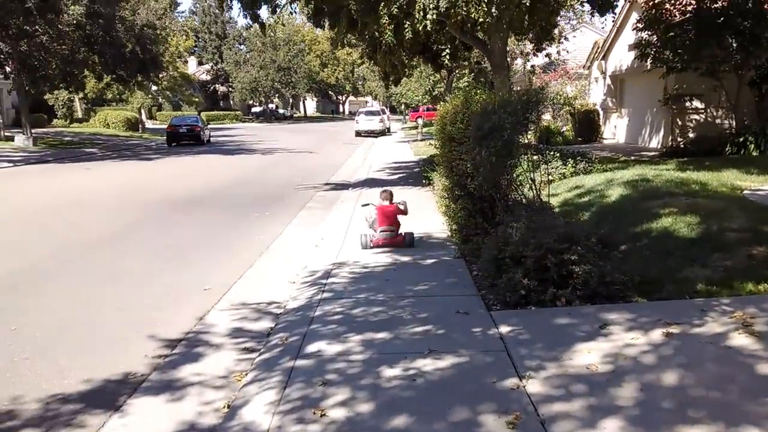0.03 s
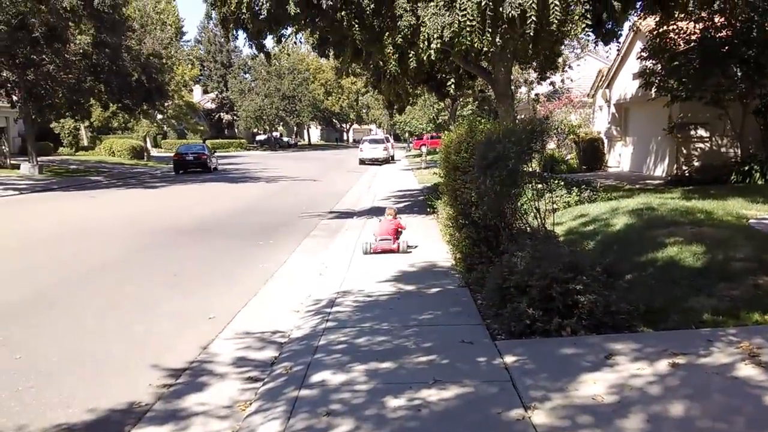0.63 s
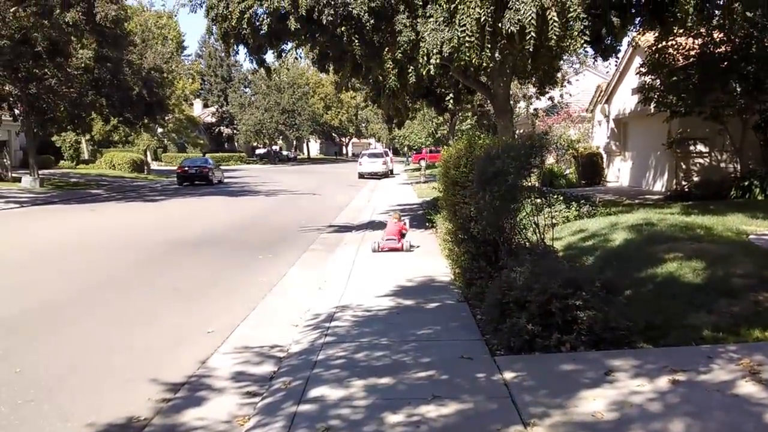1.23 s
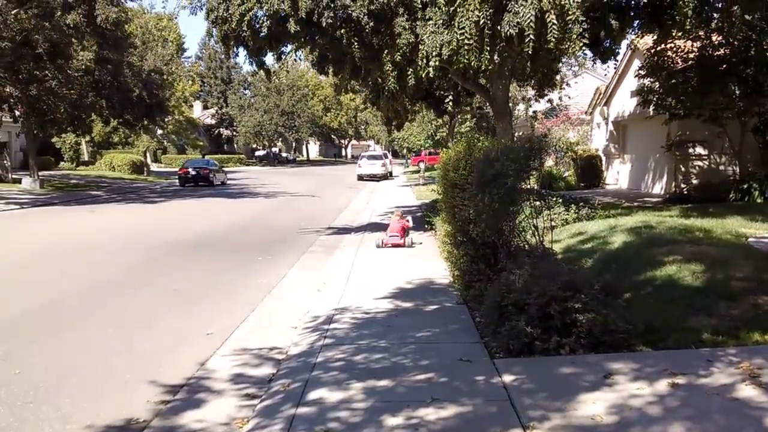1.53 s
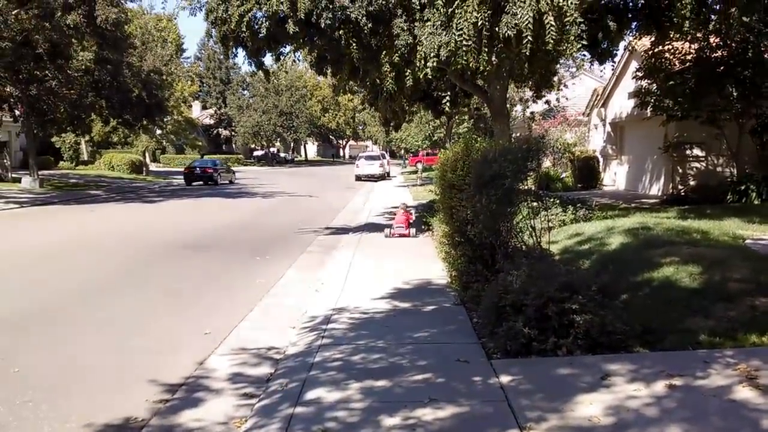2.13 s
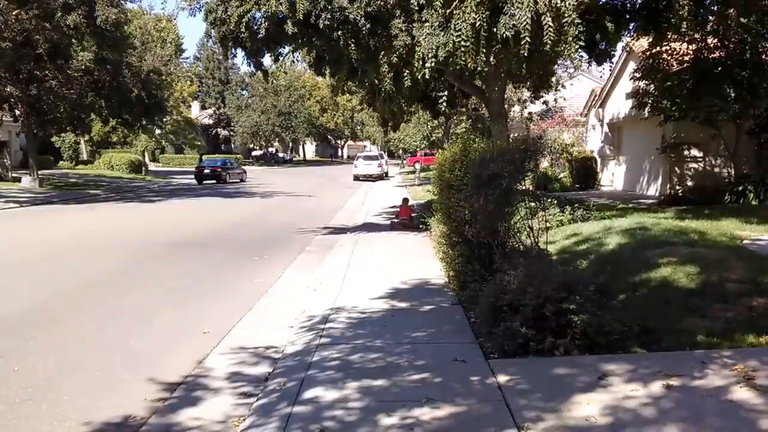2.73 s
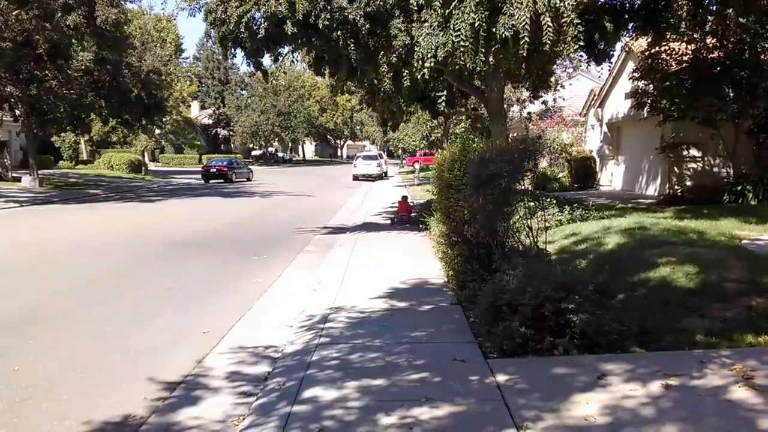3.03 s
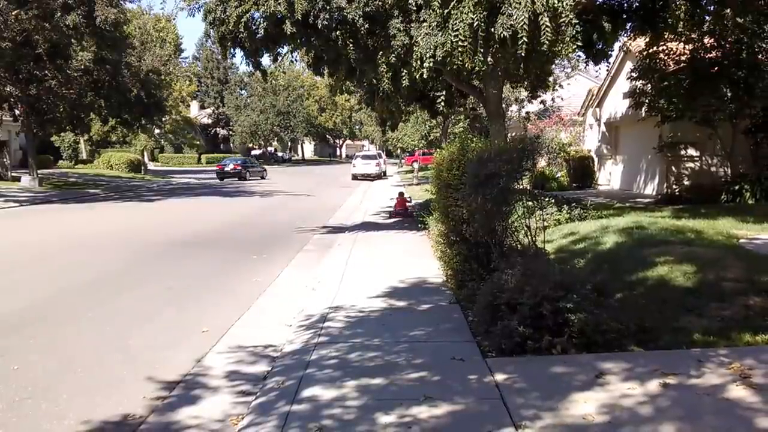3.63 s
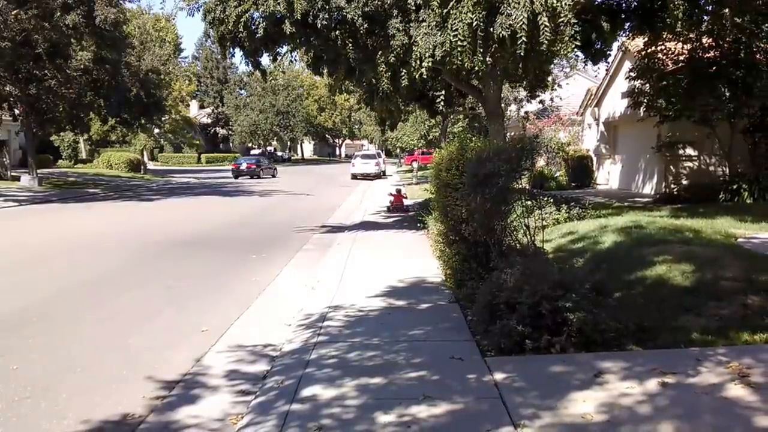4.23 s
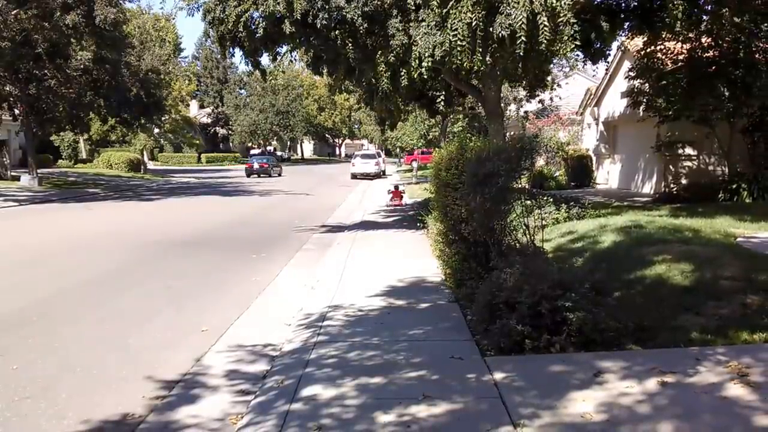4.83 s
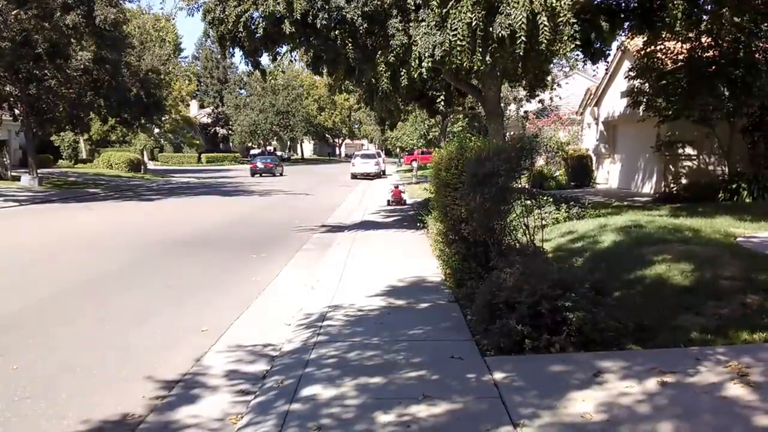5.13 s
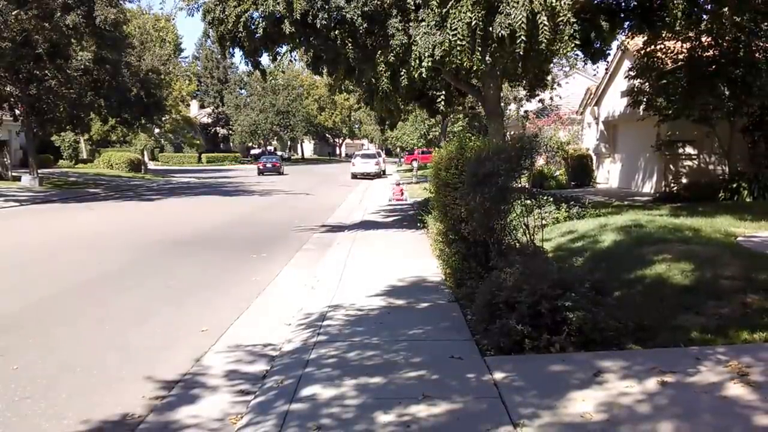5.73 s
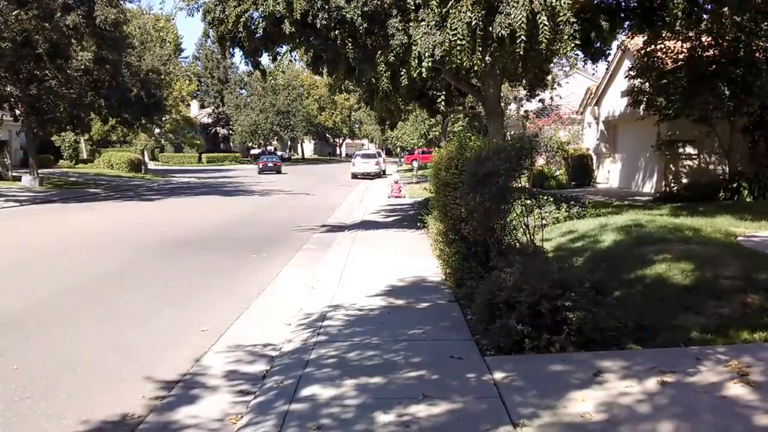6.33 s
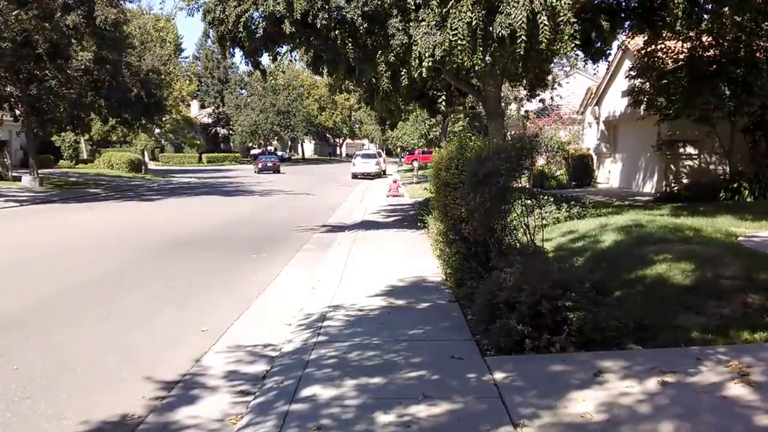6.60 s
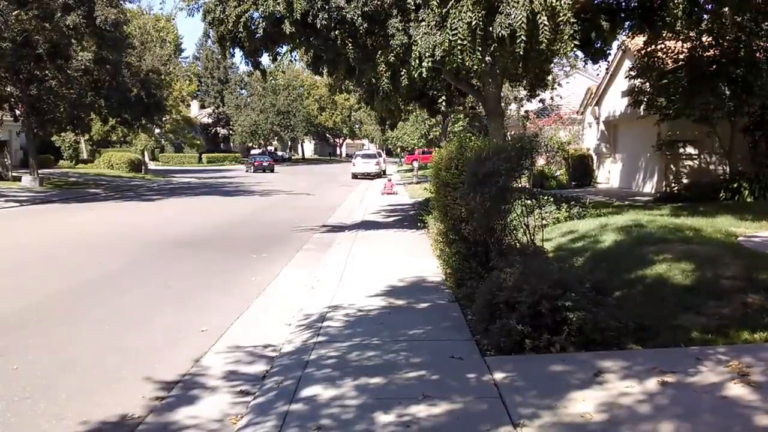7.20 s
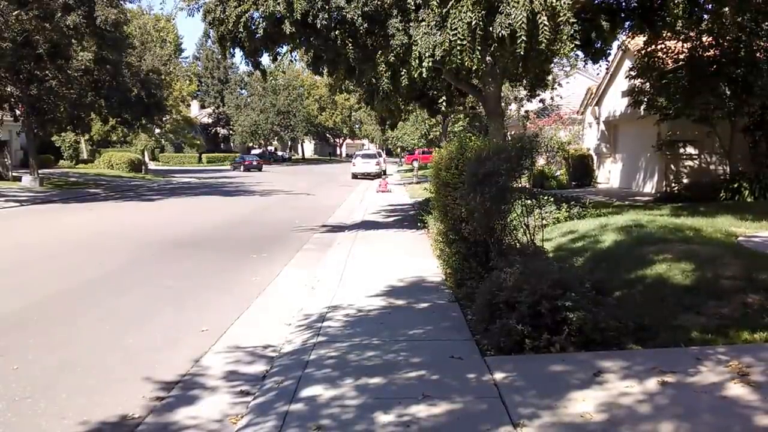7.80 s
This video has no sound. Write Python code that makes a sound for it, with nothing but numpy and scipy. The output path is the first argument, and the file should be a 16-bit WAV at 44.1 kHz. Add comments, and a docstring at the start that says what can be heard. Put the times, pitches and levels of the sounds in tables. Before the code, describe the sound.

From the start, a child's plastic tricycle rolls along a concrete sidewalk with a continuous, hollow grinding and a low rumble. Grit crackles under the scraping tread, and hard plastic gives off many irregular bright snaps with a faint rattle. A soft low thud comes at about 0.8 seconds, followed at once by a hollow wheel knock. More knocks come unevenly, bunching between 2.3 and 3.2 seconds, with sharper snaps near 2 and 3.2 seconds. From about 3.5 seconds the rumble grows a little heavier. The strongest knocks land near 4.8 and 6 seconds, and short gritty skids come around 5.4 and 6.5 seconds. The rolling continues until nearly 8 seconds, easing at the very end. Underneath are a faint wavering hum and soft gusts of air on the stereo microphone, a little stronger in the second half.

```python
"""A child's plastic tricycle rolls away along a concrete pavement. The rough slabs drum on its hollow
wheels, which grind, rumble and knock against edges. The tread scrapes, grit crackles under it, and hard
plastic snaps with a faint bright rattle. Beneath this are soft gusts of air, a faint hum and one low thud.
Two microphone ports (small openings close together) pick it up as left and right."""
import sys
import numpy as np
from scipy import signal
from scipy.fft import rfft, irfft, next_fast_len
from scipy.io import wavfile
from scipy.ndimage import uniform_filter1d

SR = 44100
rng = np.random.default_rng(int(sys.argv[2]) if len(sys.argv) > 2 else 0)


def unload_audio(sound):
    """Save the sound as a 16-bit wav file, at the path given as the first command line argument."""
    columns = np.transpose(np.atleast_2d(sound))
    # keep every value between -1 and 1, then stretch to whole-number steps
    steps = np.round(np.clip(columns, -1, 1) * 32767)
    wavfile.write(sys.argv[1], SR, steps.astype(np.int16))


N = 346626
TIME = np.arange(N) / SR

# rolling over rougher and smoother concrete: t/s, grinding level/dB, grit level/dB
ROLL_LEVELS = [(0.0, -43.5, -36.5), (0.35, -43.5, -44.5), (0.6, -39.5, -37.5), (0.68, -47, -43.5),
               (0.8, -42, -33), (0.9, -42, -42), (1.08, -42, -35.5), (1.2, -49, -41.5), (1.6, -41.5, -42),
               (1.85, -41, -35.5), (2.25, -47.5, -45), (2.39, -44, -43), (2.49, -47.5, -41.5),
               (3.03, -40.5, -40), (3.3, -43.5, -38.5), (3.79, -41.5, -42), (4.12, -43.5, -37.5),
               (4.33, -36, -39.5), (4.591, -47.5, -43.5), (4.72, -43.5, -45.5), (4.92, -40, -41),
               (5.35, -40, -44), (5.6, -42.5, -41.5), (5.79, -42.5, -43), (6.08, -38, -42), (6.4, -44, -43),
               (6.62, -39, -40.5), (6.78, -42, -49), (6.98, -47.5, -44.5), (7.2, -44, -50.5),
               (7.62, -41.5, -46), (7.74, -40, -44.5), (7.86, -48.5, -58)]
# the notes at which a hollow wheel rings: f/Hz, width/Hz, level/dB
WHEEL_NOTES = [(573, 50, 2), (661, 60, 3), (722, 79, 2), (853, 96, -4), (968, 52, 0), (1074, 142, -4),
               (1341, 117, -2.5), (1703, 78, -8.5), (1873, 76, -6)]
# short gritty skids of the tread: t/s, length/s, level/dB
TREAD_SKIDS = [(0.993, 0.076, -47), (1.98, 0.041, -47), (5.398, 0.056, -36.5), (5.974, 0.033, -39),
               (6.54, 0.13, -40.5), (7.298, 0.045, -51), (7.73, 0.05, -47)]
# tone of ringing hard plastic: f/Hz, level/dB
PLASTIC_TONE = [(300, -25), (800, -9), (1350, 0), (1700, -17), (2400, -4), (3100, 4), (3800, 4.5),
                (4500, 4), (5500, -11.5), (9000, -17)]
# tone of the grit: f/Hz, level/dB
GRIT_TONE = [(1500, -7), (2400, -3), (3100, -1.5), (3900, 2), (4600, -2.5), (5400, 0.5), (7000, 0.5),
             (8800, 1), (11000, 3), (12200, 0.5), (13200, 7.5), (15300, 4)]
# tone of the rumble: f/Hz, level/dB
RUMBLE_TONE = [(25, -3.5), (50, -9.5), (80, -2), (120, -2.5), (200, -4), (270, -2.5), (370, -4),
               (480, -1.5), (800, -14), (2000, -21.5)]
# strength of the air pushing on the ports: t/s, level/dB
GUST_LEVELS = [(0.0, -74), (0.66, -65), (0.72, -58.5), (0.92, -59), (1.02, -68), (2.2, -71), (3.7, -64.5),
               (4.0, -58.5), (7.0, -59.5), (7.7, -57), (7.86, -81)]
# tone of that air: f/Hz, level/dB
GUST_TONE = [(15, -5), (35, 4.5), (70, -2.5), (110, -11.5), (250, -7), (1000, -40.5)]
# strength of the faint hum: t/s, level/dB
HUM_LEVELS = [(0.0, -57), (0.8, -59), (1.0, -50.5), (1.25, -54), (1.7, -50.5), (2.1, -54), (2.5, -52),
              (3.05, -53), (3.3, -56), (3.9, -50.5), (4.27, -51), (4.5, -70), (6.0, -70), (6.7, -50),
              (7.3, -60)]
# snaps of the plastic, faint to loud, at set times:
# t/s, level/dB, brightness (sizzle over ring)/dB, length/ms, ring f/Hz
TIMED_SNAPS = [(0.0481, -33.5, 17, 0.97, 7300), (0.0965, -54, 9.0, 0.6, 3500),
               (0.1965, -34, 13, 0.44, 3530), (0.2272, -36, 12.0, 0.86, 4000), (0.4997, -37, 15, 0.7, 7500),
               (0.5242, -42, 20, 0.35, 6700), (0.5495, -44, 21, 0.6, 7000), (0.5704, -39, 15, 0.73, 7400),
               (0.5885, -31.5, 13, 1.9, 7800), (0.602, -34.0, 16.0, 1.9, 7200),
               (0.6172, -31.5, 20.0, 0.24, 7900), (0.7157, -41, 19, 0.8, 7700),
               (0.7386, -35.5, 14.0, 0.28, 7300), (0.7481, -32, 18, 0.3, 7800),
               (0.7906, -46, 12, 0.6, 6600), (0.7981, -29.5, -3.5, 0.77, 3340),
               (0.8354, -37, 18, 0.65, 7700), (0.9278, -31.5, 18.0, 0.58, 7900),
               (0.9903, -33.5, 1, 1.1, 3370), (1.026, -27.5, 4, 0.91, 4100), (1.0572, -38, 13, 0.6, 4300),
               (1.07, -36, 10.0, 0.7, 6700), (1.077, -29.5, 9.0, 1, 4000), (1.0901, -24.5, 10, 0.22, 4030),
               (1.1638, -37, 4.0, 1.1, 4100), (1.3154, -45, 16, 0.52, 4300), (1.4092, -29, 9, 0.19, 7400),
               (1.4775, -37, 8, 0.7, 4300), (1.4994, -45, 17, 0.78, 4200), (1.513, -39, 13, 0.6, 4000),
               (1.5338, -32.5, 9, 1.0, 4500), (1.6268, -28.5, 10, 0.4, 7100), (1.699, -36.0, 5, 1.2, 4100),
               (1.7124, -41, 0.0, 0.66, 4400), (1.7175, -30, 4, 0.5, 3720), (1.7443, -33, 9.0, 0.7, 3700),
               (1.7604, -27.5, 19, 1.5, 7960), (1.7665, -31.5, 9.0, 0.81, 8000), (1.787, -30, 8, 0.7, 4300),
               (1.7918, -27.5, 12, 0.55, 4400), (1.845, -37, 17, 0.7, 7600), (1.8517, -34, 15.0, 0.5, 4100),
               (1.883, -24.5, 13, 1.7, 7400), (1.9215, -40, 13.0, 0.5, 7400),
               (1.9749, -21, -5.5, 0.33, 3500), (2.0806, -41, 8, 0.58, 7300),
               (2.1016, -31.5, 8, 0.49, 3900), (2.3277, -27.0, 1.5, 0.46, 3700),
               (2.367, -34.5, 7, 0.53, 6000), (2.5207, -35.5, 15, 0.6, 7700),
               (2.527, -35, 15.0, 0.78, 7300), (2.5325, -36, 8.0, 0.6, 7000),
               (2.596, -34.5, 7.0, 0.76, 4900), (2.6215, -35.5, 11, 0.6, 7000),
               (2.7017, -41.0, 12.0, 0.83, 7100), (2.7109, -29, 11.0, 0.47, 7400),
               (2.7275, -40, 9, 0.52, 8000), (2.7555, -34.5, 6, 0.72, 7200), (2.7707, -32.5, 12, 0.6, 3500),
               (2.855, -36.5, 3, 0.9, 4300), (2.8961, -38, 11, 0.6, 4500), (2.9576, -39, -4.0, 1.3, 4100),
               (2.9697, -35, -3, 0.68, 4130), (2.9771, -43, 13, 0.6, 4100), (3.0007, -37, 14, 0.6, 7900),
               (3.0147, -31, 8, 0.69, 6440), (3.1761, -20.0, 3, 1.4, 4150), (3.1935, -24.5, 6, 1.1, 4400),
               (3.2759, -33, 12, 0.73, 6800), (3.3746, -43, -2, 0.68, 4500), (3.4091, -35, 6.0, 0.84, 4000),
               (3.6138, -35.5, 11, 0.68, 4300), (3.6605, -44.5, -15, 0.95, 3300),
               (3.7594, -43, 1, 0.66, 4500), (3.8098, -39, 11, 0.6, 7200), (4.0992, -41, 10, 0.53, 7900),
               (4.1785, -28, 1.0, 0.35, 3600), (4.2541, -37, -7.0, 2.3, 3300),
               (4.2765, -40, -22, 0.9, 3620), (4.3365, -41, 15, 0.6, 6500), (4.3948, -36, 10, 0.95, 4400),
               (4.3995, -35, 4, 0.7, 4500), (4.4383, -30.5, 13, 2.6, 3600), (4.4585, -40, 13, 0.6, 7200),
               (4.4679, -30.0, 15, 0.32, 3700), (4.5276, -40, 18, 0.77, 7300), (4.5889, -37, 9, 0.99, 4000),
               (4.7929, -37, 9, 0.6, 7900), (4.7998, -31.0, 0, 1, 7560), (4.8095, -25.5, -3, 0.65, 6300),
               (4.9007, -33.5, 0, 1.0, 4300), (4.9655, -35, 9.0, 0.8, 4000), (4.9775, -38, 15, 0.8, 7800),
               (4.9898, -32, 11.0, 0.7, 4100), (5.0098, -26, 12, 2.9, 4600),
               (5.0657, -29.5, 16.0, 1.5, 7040), (5.1547, -42, 17, 0.55, 7400),
               (5.2239, -33, 12, 1.4, 4000), (5.2492, -31.5, 13, 0.31, 4040),
               (5.2958, -44.0, 26, 0.6, 7100), (5.4125, -47, -18.0, 0.98, 3280),
               (5.4521, -22, 0, 0.2, 4200), (5.6864, -37.0, 11.0, 0.4, 6700), (5.733, -34, 18, 0.5, 7800),
               (5.9383, -38, 10, 0.76, 3500), (5.9496, -39, 14, 0.6, 6400), (5.9608, -38, 14.0, 0.7, 3500),
               (5.9813, -36, 9, 0.85, 4000), (6.065, -34.5, 6, 0.89, 3900), (6.088, -39, 13, 0.6, 3000),
               (6.1209, -36.5, 3.0, 0.76, 3600), (6.1443, -39, 17, 1.0, 7500), (6.1783, -29, 22, 1.1, 7740),
               (6.3447, -37.5, 14, 0.6, 7100), (6.441, -39.5, 1, 0.53, 3700),
               (6.4841, -36.5, 7.0, 1.6, 5500), (6.5918, -37, 14.0, 1.4, 3800),
               (6.6085, -31.5, 11, 1.4, 3600), (6.6283, -34, 12, 1.7, 4000), (6.6843, -24.5, 12, 2, 4030),
               (6.8325, -30.5, 7, 2.4, 4000), (6.8929, -30, 18.0, 1.1, 3800), (6.9185, -46, 5, 0.3, 6800),
               (6.9405, -37.5, 11, 0.93, 4000), (7.0403, -41.5, 17, 0.9, 3900),
               (7.0975, -44.5, -21, 1.1, 3760), (7.3308, -36, 3.0, 1.2, 4300),
               (7.3686, -42, 17, 0.43, 3900), (7.511, -37, 9, 0.55, 4100), (7.6598, -49, -23, 1.7, 3500),
               (7.699, -44, 10, 0.8, 3700), (7.7252, -38, 22, 0.92, 4200), (7.7532, -39, 12, 0.6, 3300),
               (7.7609, -31.5, 22, 0.41, 7200)]
# tone of a snap's hard crack: f/Hz, level/dB
CRACK_TONE = [(600, -12), (2200, -7), (4500, -9), (6800, 3.5), (8800, -1), (11000, -14), (13000, 7.5),
              (16000, -63)]
# tone of a snap's high sizzle: f/Hz, level/dB
SIZZLE_TONE = [(6000, -41), (10000, -4.5), (12000, -5.5), (13200, -0.5), (15300, 4), (17000, -53)]
# hollow knocks of the wheels: t/s, level/dB, f/Hz, level of the scrape just before/dB
WHEEL_KNOCKS = [(0.4418, -29.5, 1356, 7.5), (0.4564, -23, 873, -2), (0.8535, -19, 822, -1.5),
                (0.992, -31.5, 876, -19), (1.0915, -29, 1390, -10), (1.134, -36, 795, -12),
                (1.434, -22, 1237, 1), (1.5498, -25.5, 946, -9), (1.5673, -31, 945, 5),
                (1.802, -32.5, 940, -6), (1.976, -23.5, 777, -15), (2.3279, -27.5, 787, -18),
                (2.35, -32, 794, -16), (2.38, -31.5, 886, -11), (2.59, -30, 925, -8),
                (2.644, -32, 1325, -5), (2.6658, -29, 904, -2), (2.9207, -25.5, 750, -14),
                (2.9425, -29.5, 830, -11), (2.998, -26, 914, -3), (3.0147, -26, 674, 1),
                (3.0942, -23.5, 1360, -13), (3.11, -29, 1370, -6), (3.1759, -23, 842, -1),
                (3.707, -33, 1125, 2), (4.266, -29, 1230, 2), (4.3014, -26.5, 715, -1),
                (4.811, -29, 1480, -6), (4.849, -15, 973, -2), (5.414, -27, 860, 1), (5.423, -32, 1160, 7),
                (5.4305, -22, 900, -3), (5.504, -36.5, 800, -8), (5.9931, -17.5, 918, 1.5),
                (6.2826, -33, 1175, -12), (6.559, -29, 1155, -4), (6.5748, -34, 824, 11),
                (6.711, -32.5, 1020, -9), (7.0972, -29, 1456, -20), (7.12, -34.5, 954, -3),
                (7.6607, -28.5, 1260, -14), (7.692, -23.5, 1077, -4)]
# how the two ports hear: f/Hz, left delay/cycles, left minus right level/dB, shared part (0 to 1)
PORT_HEARING = [(30, -.48, 0, .8), (65, -.25, -4, .5), (130, -.1, -3, .7), (370, -.08, -2, .62),
                (600, -.025, -1, .95), (1400, 0, .5, .97), (1850, 0, 2, .9), (2200, .29, 3, .35),
                (2400, .48, 1, .8), (2500, .5, 0, .985), (2680, .5, 0, .99), (2820, .56, -2.5, .78),
                (3000, .71, -7, .35), (3200, .89, -4, .7), (3500, .98, -2, .95), (4200, 1.01, 1, .92),
                (4700, 1.15, 5, .35), (5200, 1.44, 0, .7), (5600, 1.45, -2, .4), (5900, 2, -4, .35),
                (6400, 2.04, 0, .75), (7200, 2.3, 5, .5), (8100, 2.51, 2, .75), (8700, 2.63, -2, .35),
                (9100, 3.03, -4, .35), (10300, 3.5, 2, .8), (11200, 3.78, -1, .65), (12000, 4.2, -3, .7),
                (12800, 4.5, -1, .93), (13400, 4.72, -1, .9), (14400, 5.19, -2, .85), (15100, 5.5, 0, .92)]


def undb(db):
    """Turn decibels into a number to multiply by."""
    return 10 ** (np.asarray(db) / 20)


def unit(x):
    """Scale to an average strength (rms) of 1."""
    return x / np.sqrt(np.mean(x ** 2))


def noise():
    """Three separate noises: heard by both ports, by the left only, by the right only."""
    return rng.standard_normal((3, N))


def response(points):
    """A filter's answer to one click; it follows (Hz, dB) points and keeps white noise equally strong."""
    size = 4096
    hz, db = np.transpose(points)
    grid_hz = np.maximum(np.fft.rfftfreq(2 * size, 1 / SR), 1)
    gain = unit(undb(np.interp(np.log(grid_hz), np.log(hz), db)))
    cepstrum = irfft(np.log(gain))
    cepstrum[1:size] *= 2  # fold it in half, so nothing sounds before the click
    cepstrum[size + 1:] = 0
    return irfft(np.exp(rfft(cepstrum)))[None, :size]


def colour(x, points):
    """Give a sound the tone of (Hz, dB) points."""
    return signal.oaconvolve(x, response(points), axes=1)[:, :N]


def resonate(x, hz, width_hz):
    """Make a sound ring at one pitch; a smaller width rings longer."""
    return signal.lfilter(*signal.iirpeak(hz, hz / width_hz, fs=SR), x)


def fade(x, seconds):
    """Spread each value into a tail that dies away."""
    keep = np.exp(-1 / (seconds * SR))
    return signal.lfilter([1 - keep], [1, -keep], x)


def walk(rate):
    """A smooth random wander of size about 1 that turns `rate` times a second."""
    step = int(SR / rate)
    stairs = np.repeat(rng.standard_normal(N // step + 1), step)
    return unit(uniform_filter1d(stairs, step)[:N])


def impacts(rate, spread_db):
    """Energy of about `rate` random hits a second, many weak and a few strong; it averages 1."""
    hit = rng.random(N) < rate / SR
    energy = hit * undb(spread_db * np.minimum(rng.exponential(size=N), 3)) ** 2
    return energy / energy.mean()


def add(out, s, sound):
    """Mix a short sound in at s seconds."""
    i = int(s * SR)
    out[..., i:i + sound.shape[-1]] += sound[..., :max(N - i, 0)]


def wheel(push):
    """A pushed hollow wheel rings at its own notes, with little bass and little treble."""
    ring = sum(undb(db) * (-1) ** k * resonate(push, hz, width)
               for k, (hz, width, db) in enumerate(WHEEL_NOTES))
    return signal.sosfilt(signal.butter(3, [430, 2100], "band", fs=SR, output="sos"), ring)


def grind(grind_db):
    """Rough concrete drums on the wheels: a steady noise plus separate little bumps."""
    bumps = fade(impacts(rate=180, spread_db=4.0), seconds=0.0027)
    ring = unit(wheel(noise() * np.sqrt(0.9 + bumps)))
    flutter_db = 1.5 * walk(rate=22)
    return ring * undb(grind_db - 1.3 + flutter_db)


def rasp(grind_db, rise_db_per_s=1.0):
    """The scraping tread sets the plastic ringing; it slowly gains on the grinding and swells in skids."""
    gain = undb(grind_db - 14 + rise_db_per_s * TIME)
    for s, length_s, db in TREAD_SKIDS:
        progress = np.clip((TIME - s) / length_s, 0, 1)
        gain += undb(db) * np.sqrt(np.abs(np.sin(np.pi * progress)))
    scrape = noise() * np.sqrt(fade(impacts(rate=300, spread_db=4.5), seconds=0.0018))
    return colour(scrape, PLASTIC_TONE) * gain


def chip(length_ms, ring_db, hz):
    """One brittle crack of energy 1: a tiny burst of noise that rings at its own pitch."""
    spent = TIME[:512] * 1000 / max(length_ms, .1)
    burst = rng.standard_normal((3, len(spent))) * (1 - np.exp(-2 * spent)) * np.exp(-spent)
    burst += undb(ring_db) * resonate(burst, hz, width_hz=400)
    return burst / np.linalg.norm(burst, axis=1, keepdims=True)


def crackle(grit_db):
    """Grit lies in patches; its grains crack in pairs under the tread, over a scraping hiss."""
    patches_db = 2.5 * walk(rate=14)
    grains = np.zeros((3, N))
    for place, force, gap, pitch in rng.random((320, 4)):
        s = place * TIME[-1]
        hz = 3000 * 5 ** pitch
        db = 4.6 * min(-np.log(1 - force), 1.7)  # many weak grains, a few strong ones
        add(grains, s, undb(db) * chip(length_ms=.25, ring_db=4, hz=hz))
        add(grains, s + 0.0016 + 0.0095 * gap, undb(db - 3) * chip(length_ms=.5, ring_db=9, hz=hz))
    hiss = noise() * np.sqrt(.5 + .6 * fade(impacts(rate=400, spread_db=3), seconds=.0015))
    grit = colour(undb(-3.8) * hiss + undb(-2.8) * unit(grains), GRIT_TONE)
    return grit * undb(grit_db + 2.5 + patches_db)


def rumble(grind_db, heavy_from_s=3.34, rise_s=1):
    """Low rolling noise follows the grinding; it is heavier on the second stretch of pavement."""
    heavy_db = 4 * np.clip((TIME - heavy_from_s) / rise_s, 0, 1)
    return colour(noise(), RUMBLE_TONE) * undb(grind_db - 8 + heavy_db + walk(rate=6))


def gusts(swing_db=4):
    """Moving air pushes softly on the ports in short gusts."""
    level_db = np.interp(TIME, *np.transpose(GUST_LEVELS)) + 8 + swing_db * walk(rate=7)
    return colour(noise(), GUST_TONE) * undb(level_db)


def hum(hz=190.5, drift=0.024, waver_db=2.4):
    """A faint low hum wavers in pitch and strength."""
    phase = 2 * np.pi * np.cumsum(hz * (1 + drift * walk(rate=14))) / SR
    tone = unit(np.sin(phase) * undb(waver_db * walk(rate=12)))
    return tone * undb(np.interp(TIME, *np.transpose(HUM_LEVELS)) - 5)


def scattered_snaps(grit_db, count=18):
    """Rows like TIMED_SNAPS for bright snaps at random moments; their level follows the grit."""
    place, force, tone, span, pitch = rng.random((count, 5)).T
    s = place * TIME[-1]
    level_db = np.interp(s, TIME, grit_db) + 5.5 + 2 * (force - .5)
    bright_db = 19 + 5 * (tone - .5)
    return np.column_stack([s, level_db, bright_db, .5 + span, 3300 + 4500 * pitch])


def bursts(times, levels_db, lengths_ms, pitches_hz, tone, early, early_s, late, late_s):
    """Short bursts, each with a quick tail (early) and a faint rattle (late) as shares of its energy."""
    out = np.zeros((3, N))
    body = response(tone)[:, :256]
    scale = np.sqrt(0.005 * SR)  # a level is the average strength over 5 ms
    for s, db, length_ms, hz in zip(times, levels_db, lengths_ms, pitches_hz):
        burst = signal.fftconvolve(chip(length_ms, ring_db=5, hz=hz), body, axes=1)
        add(out, s, scale * undb(db) * burst / np.linalg.norm(burst, axis=1, keepdims=True))
    power = out[0] ** 2
    rattle = 1 + 0.78 * fade(impacts(rate=190, spread_db=0.5), seconds=0.0047)
    tail_power = early * fade(power, early_s) + late * fade(power, late_s) * rattle
    return out + colour(noise() * np.sqrt(tail_power), tone)


def snaps(grit_db):
    """Hard plastic snaps with a crack, a high sizzle and a longer, lower ring; bright snaps ring less."""
    s, level_db, bright_db, length_ms, hz = np.vstack([TIMED_SNAPS, scattered_snaps(grit_db)]).T
    crack = bursts(s, level_db - 2, length_ms * 0.75, hz, CRACK_TONE,
                   early=0.22, early_s=0.0024, late=0.14, late_s=0.025)
    sizzle_hz = rng.uniform(10160, 14850, len(s))
    sizzle = bursts(s, level_db + bright_db / 2 - 3, length_ms * 0.7, sizzle_hz, SIZZLE_TONE,
                    early=0.18, early_s=0.002, late=0.24, late_s=0.015)
    ring = bursts(s, level_db - bright_db / 2 - 0.5, length_ms * 1.15, hz, PLASTIC_TONE,
                  early=0.24, early_s=0.0026, late=0.08, late_s=0.05)
    return crack + sizzle + ring


def knocks(lead_s=0.0093, ring_s=0.0016, sag_s=0.0046, chatter_s=0.014):
    """A wheel scrapes on an edge, drops with a hollow knock that sags in pitch, bounces and chatters."""
    out = np.zeros(N)
    age = TIME[:4096]
    drop = int(lead_s * SR)
    since_drop = np.maximum(age - lead_s, 0)
    landed = since_drop > 0
    sag = 1 + 0.18 * (np.exp(-since_drop / sag_s) - .5)
    for (s, db, hz, scrape_db), chance in zip(WHEEL_KNOCKS, rng.random((len(WHEEL_KNOCKS), 4))):
        push = np.zeros(len(age))
        push[drop] = 1
        bounces = drop + (np.cumsum(0.004 + 0.005 * chance) * SR).astype(int)  # 4 to 9 ms apart
        push[bounces] = 0.47 * 0.5 ** np.arange(len(chance))
        catch = rng.standard_normal(len(age)) * np.exp(-age / 0.0071)  # the wheel catches the edge
        catch /= np.linalg.norm(catch)
        scrape = 0.43 * resonate(resonate(catch, 1900, 1000), 1500, 1500)
        scrape += 0.25 * resonate(catch, 3370, 550)
        swell = fade(fade(push, ring_s), seconds=.0003)
        phase = 2 * np.pi * np.cumsum(hz * sag * landed) / SR
        ring = undb(-32) * swell / swell.max() * np.sin(phase)
        chatter = rng.standard_normal(len(age)) * np.exp(-age / chatter_s) * landed
        chatter *= undb(-7.5) / np.linalg.norm(chatter)
        knock = ring + undb(scrape_db) * scrape + wheel(0.71 * push + chatter)
        loudest = np.sqrt(uniform_filter1d(knock ** 2, size=132).max())  # its strongest 3 ms
        add(out, s - lead_s, knock * undb(db - 3) / loudest)
    return out


def thud(at_s=0.762, half_length_s=0.017, hz=75):
    """One soft, low thud swells and dies within a few cycles."""
    since = TIME - at_s
    return undb(-38) * np.exp(-(since / half_length_s) ** 2) * np.sin(2 * np.pi * hz * since)


def ports(sound):
    """The left port hears the treble a little late; scattered sound differs between the two."""
    size = 2 * next_fast_len(N // 2 + 4096)
    grid_hz = np.fft.rfftfreq(size, 1 / SR)
    hz, *columns = np.transpose(PORT_HEARING)
    delay_cycles, pan_db, shared = (np.interp(grid_hz, hz, column) for column in columns)
    both, left_only, right_only = rfft(sound, size)
    left = np.sqrt(shared) * both + np.sqrt(1 - shared) * left_only
    right = np.sqrt(shared) * both + np.sqrt(1 - shared) * right_only
    left *= np.exp(-2j * np.pi * delay_cycles)
    return irfft(np.array([left * undb(pan_db / 2), right * undb(-pan_db / 2)]))[:, :N]


def scene():
    """The rolling tricycle and the quiet sounds around it, heard at the two ports."""
    s, *columns = np.transpose(ROLL_LEVELS)
    grind_db, grit_db = (np.interp(TIME, s, column) for column in columns)
    tread = grind(grind_db) + rasp(grind_db) + crackle(grit_db) + snaps(grit_db)
    sound = tread + rumble(grind_db) + gusts()
    sound[0] += knocks() + hum() + thud()  # row 0 reaches both ports
    return ports(sound)


def record(dry):
    """The tallest spikes are held below full scale, and the recorder cuts the treble above 15500 Hz."""
    clipped = np.clip(dry, -.85, .85)
    return signal.sosfilt(signal.ellip(8, .2, 70, 15500, fs=SR, output="sos"), clipped)


dry = scene()
out = record(dry)
unload_audio(out)
```